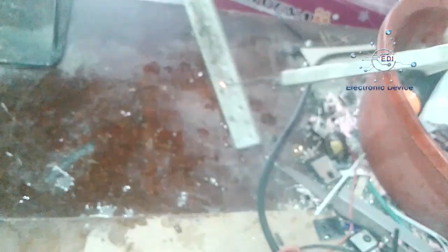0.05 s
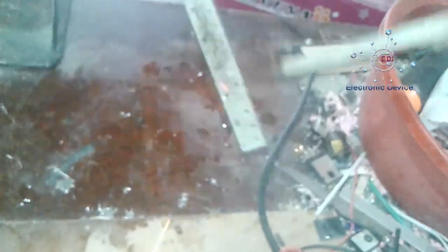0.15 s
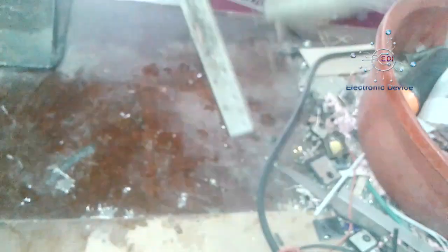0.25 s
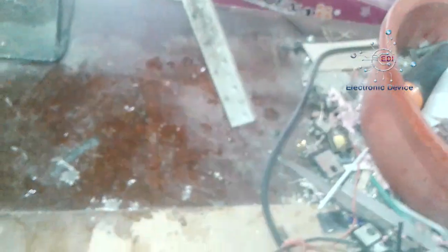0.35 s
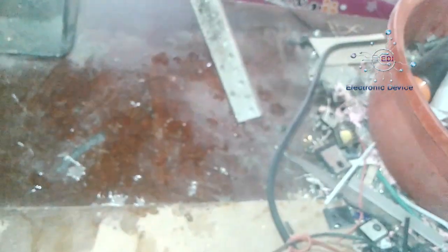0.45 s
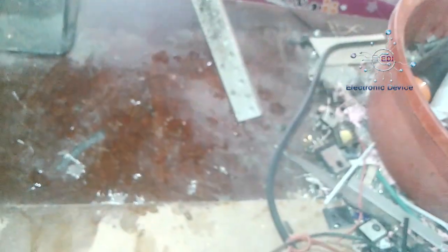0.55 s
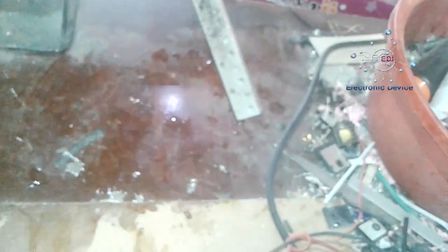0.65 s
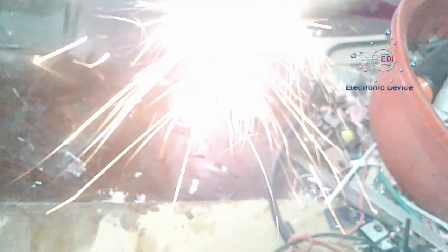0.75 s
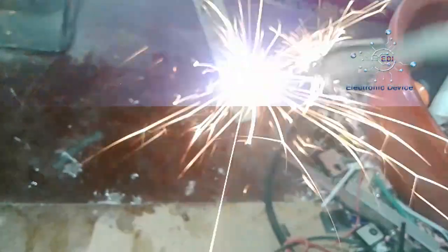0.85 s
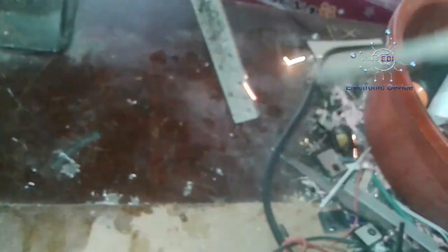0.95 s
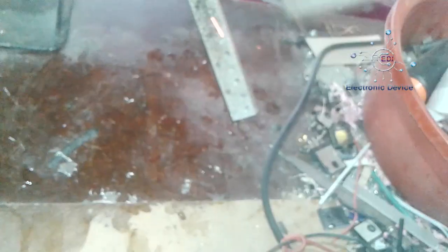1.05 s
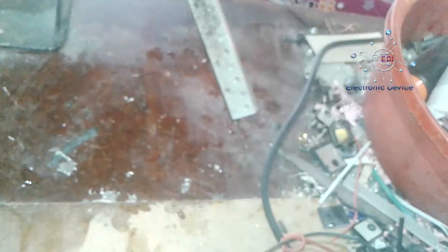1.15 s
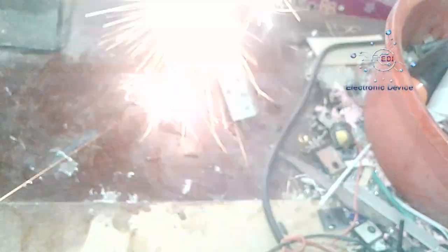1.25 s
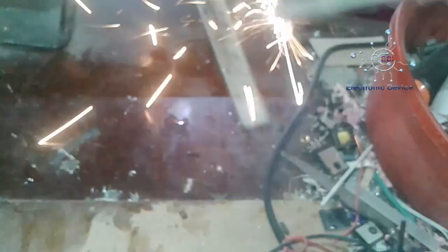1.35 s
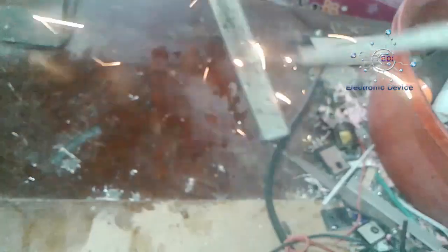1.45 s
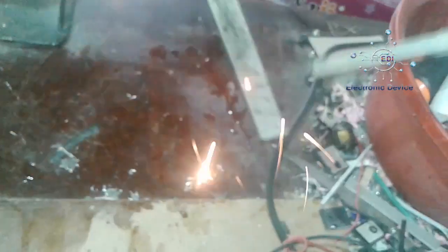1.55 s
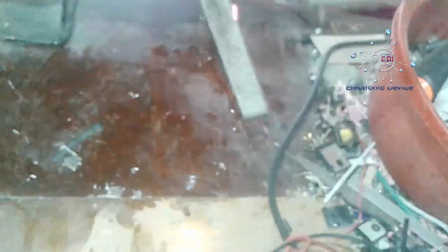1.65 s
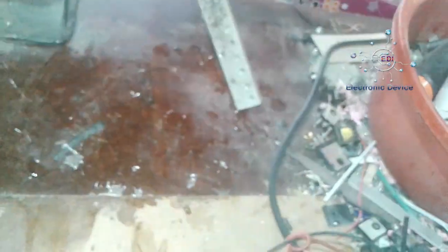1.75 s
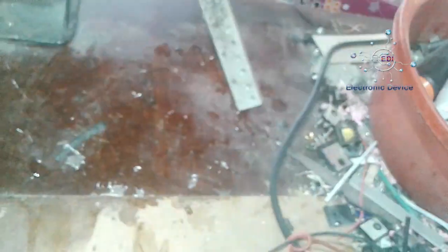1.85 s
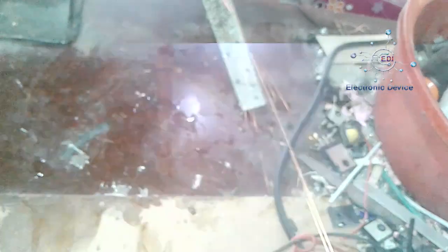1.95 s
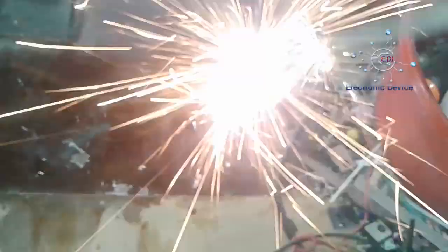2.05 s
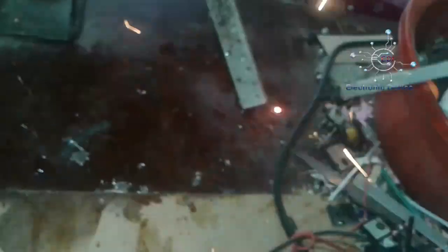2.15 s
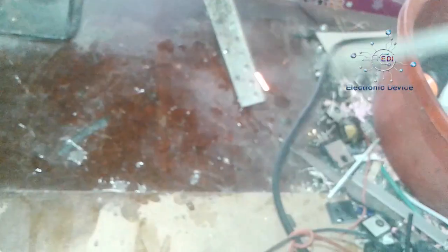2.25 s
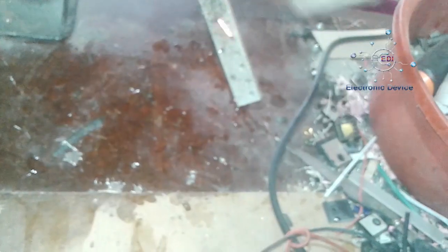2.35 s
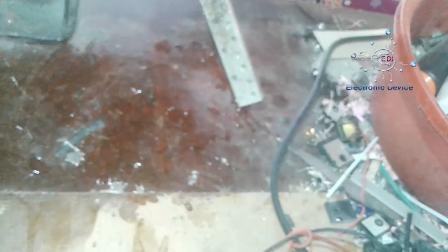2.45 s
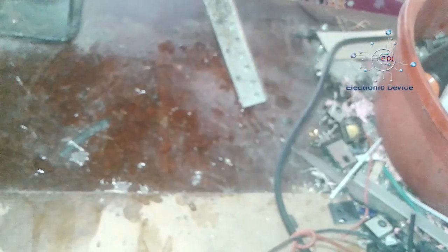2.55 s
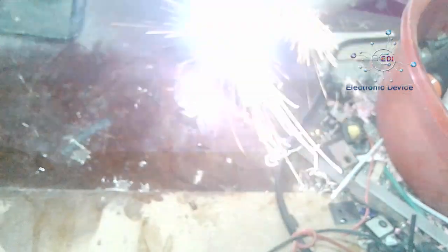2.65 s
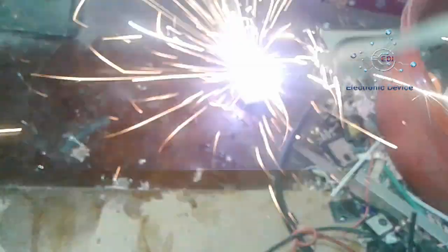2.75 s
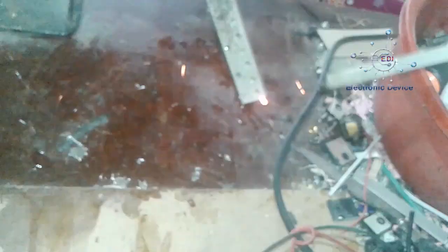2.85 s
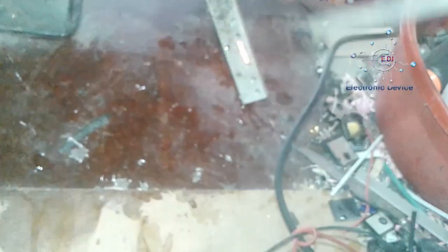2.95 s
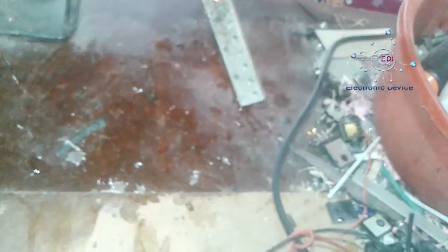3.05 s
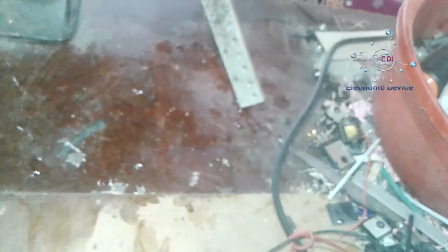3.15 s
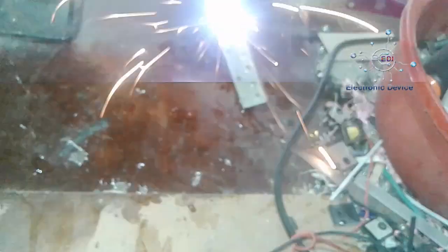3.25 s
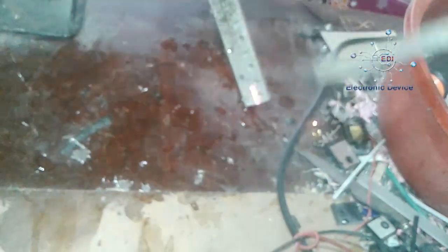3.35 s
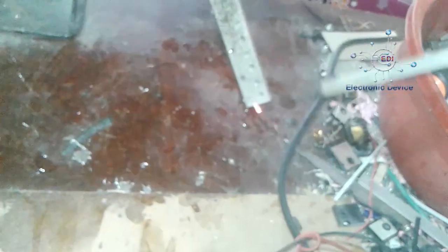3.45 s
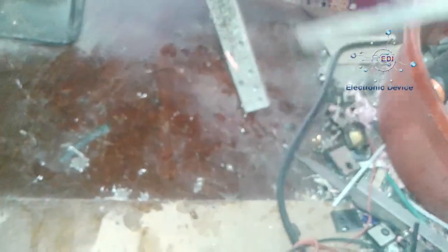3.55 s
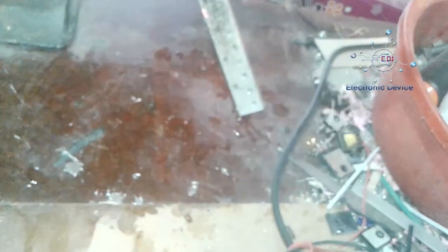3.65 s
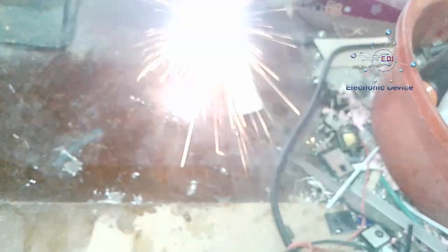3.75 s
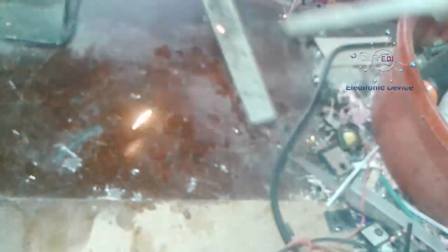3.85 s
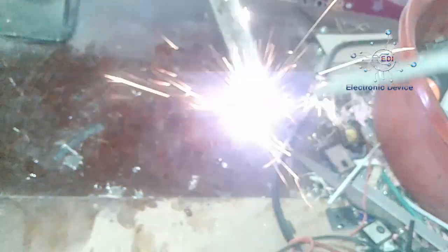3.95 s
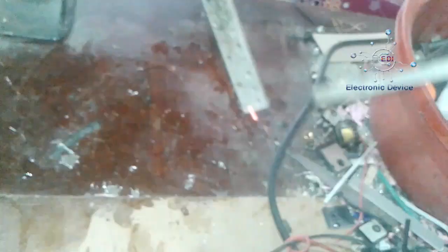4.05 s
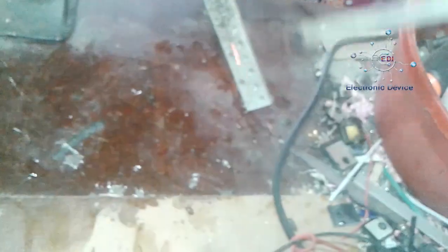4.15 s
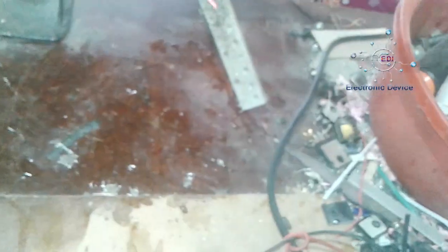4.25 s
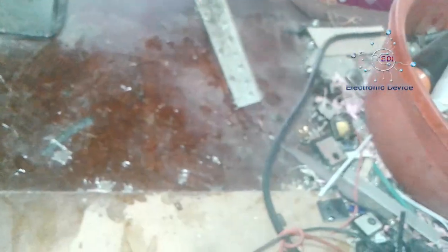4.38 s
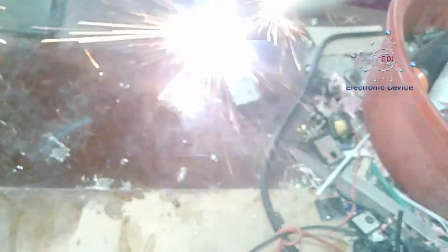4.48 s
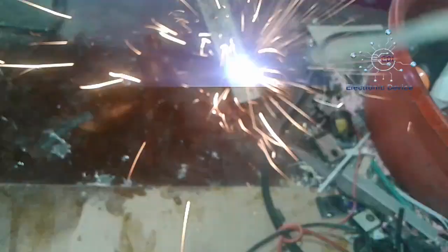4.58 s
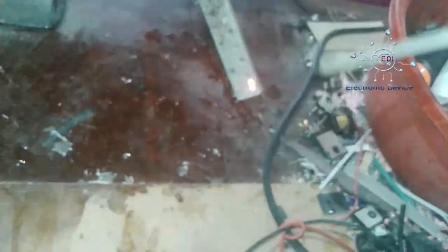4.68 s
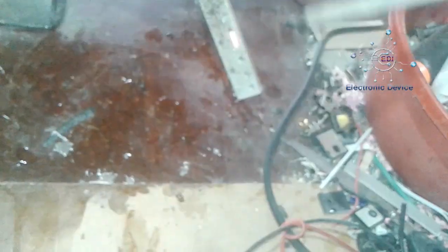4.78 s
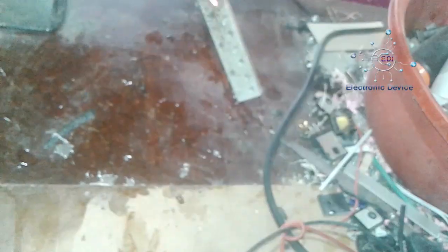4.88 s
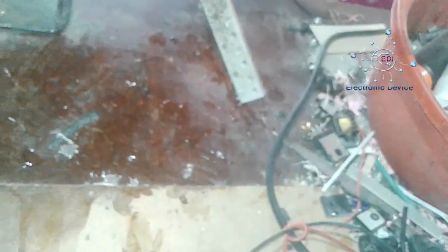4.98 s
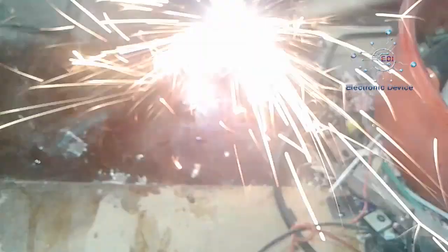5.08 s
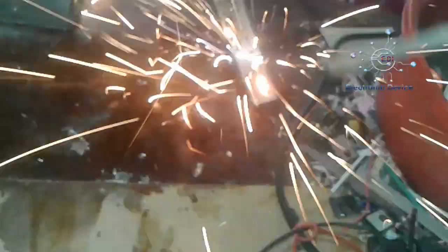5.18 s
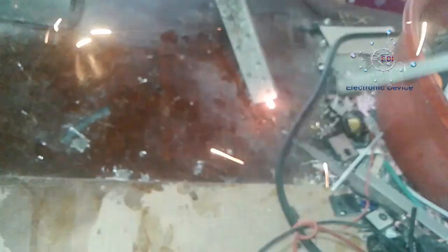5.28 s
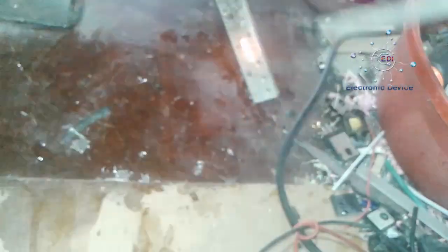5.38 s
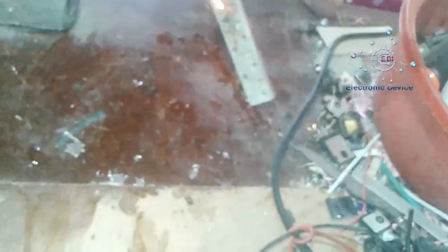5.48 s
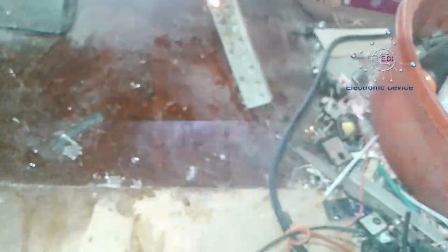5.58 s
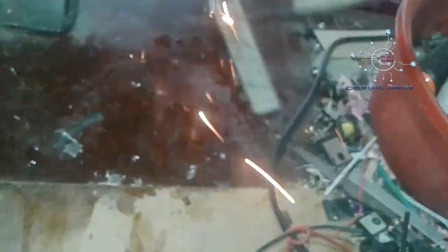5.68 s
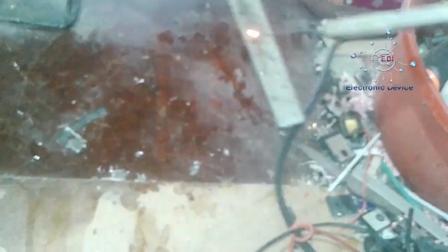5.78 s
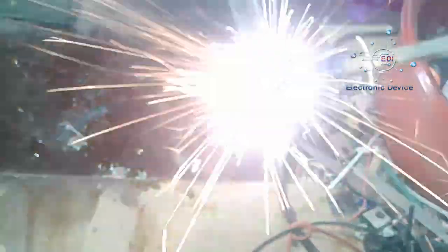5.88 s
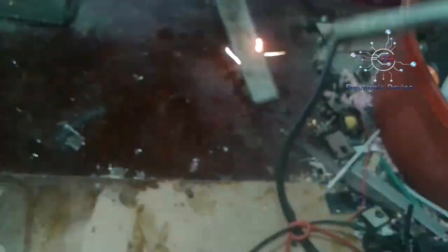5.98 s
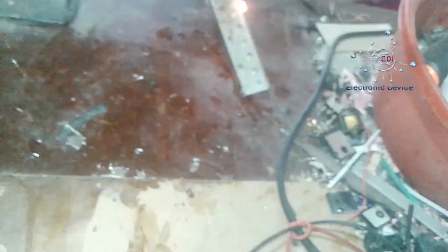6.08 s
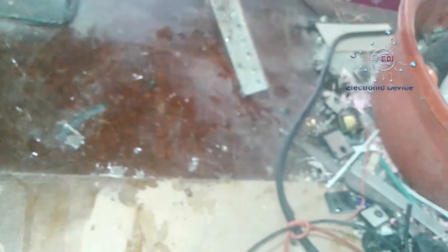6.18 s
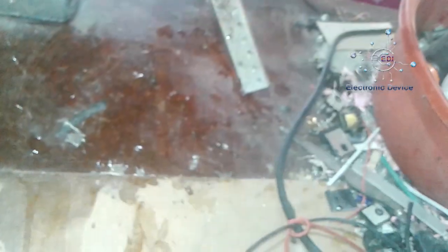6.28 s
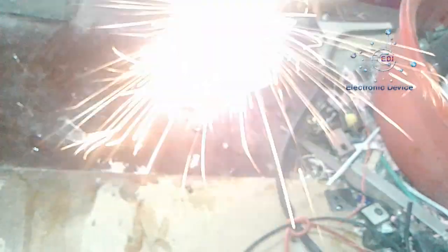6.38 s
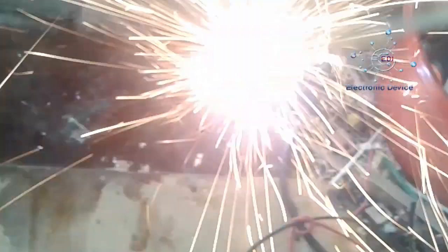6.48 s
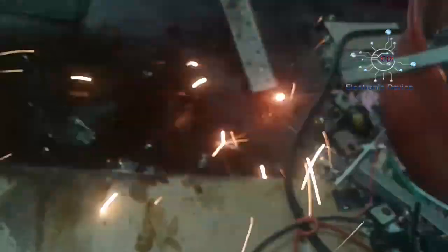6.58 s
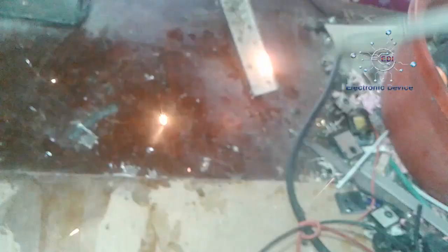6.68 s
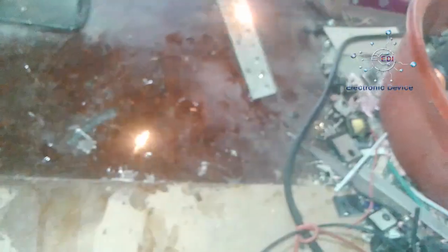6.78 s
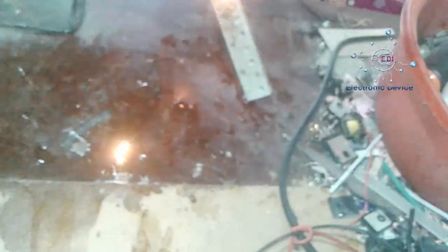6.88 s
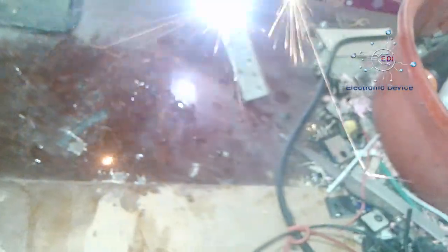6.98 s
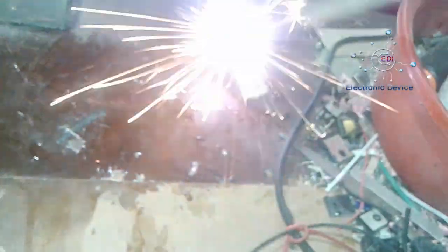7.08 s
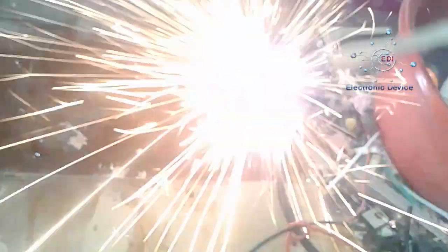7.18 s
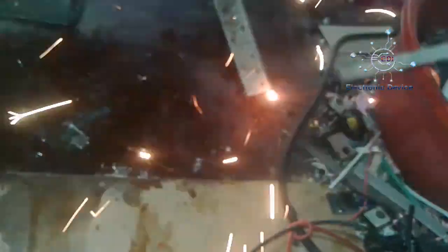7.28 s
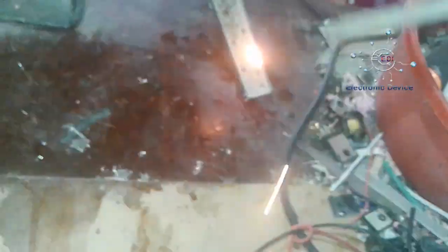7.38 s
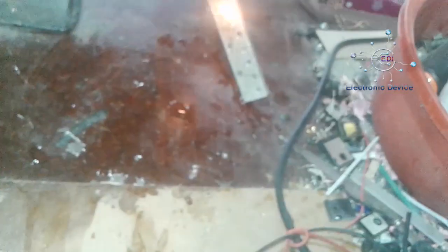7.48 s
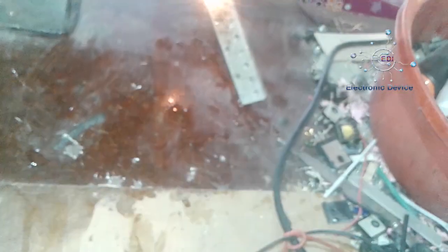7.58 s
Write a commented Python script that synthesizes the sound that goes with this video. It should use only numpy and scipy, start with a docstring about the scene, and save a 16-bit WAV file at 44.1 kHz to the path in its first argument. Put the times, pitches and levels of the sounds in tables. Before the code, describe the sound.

Loud sparks crack again and again as a lead touches a metal strip on a workshop bench, some single dry pops, others brief sputtering arcs. Beneath them an inverter keeps up a thin, fluttering, high-pitched whine, heard plainly in the gaps. The longest crackles come near the end. The microphone is close and distorts on the strongest snaps, each followed by a short room echo, with low room noise and a few soft bumps underneath.

```python
"""A thin, high whine, broken almost at once by sharp electric snaps, close to the microphone.
On the bench of a small, hard workshop, a high-voltage inverter runs while its lead is tapped against
a metal strip again and again. The whine is a train of ringing transformer ticks that switches between
two rates; while the lead is near the strip, the pulses jump the gap as sparks. The snaps fill the
room and overload the microphone. Low room noise and a few soft handling bumps lie underneath."""
import sys
import numpy as np
from scipy import signal
from scipy.fft import rfft, irfft
from scipy.io import wavfile
from scipy.ndimage import uniform_filter1d, minimum_filter1d

SR = 44100
rng = np.random.default_rng(int(sys.argv[2]) if len(sys.argv) > 2 else 0)


def master_out(mix):
    """Clip the mix to full scale and print it as 16-bit PCM to the path in sys.argv[1]."""
    frames = np.transpose(np.atleast_2d(mix))
    ceiling = np.clip(frames, -1, 1)
    pcm = np.round(ceiling * 32767).astype(np.int16)
    wavfile.write(sys.argv[1], SR, pcm)


N = 336483
TIME = np.arange(N) / SR

# Levels in the tables are relative, before each source's own gain.
# Arcs, one per touch of the lead: start_s, length_s, level_db, sputters_per_s
LEAD_TOUCHES = [(.002, 0.0029, -17, 0), (0.153, 0, -7, 500), (.697, 0.0098, -4.5, 500),
                (0.728, .079, 0, 220), (0.86, 0.011, 3.5, 80), (1.297, 0.076, -6, 40),
                (1.397, .046, -13.5, 0), (1.5507, 0.0056, -16, 0), (2.048, 0.096, -3.5, 130),
                (2.713, 0.099, -2, 170), (3.2448, 0, -8, 250), (3.275, 0.025, 2, 250),
                (3.811, 0.018, -16, 0), (3.848, 0.0024, -12.5, 0), (3.9788, 0.022, -9, 0),
                (4.022, 0.016, -2.5, 300), (4.491, 0.014, -8, 0), (4.536, .098, -3.5, 130),
                (5.1143, 0.02, -10.5, 0), (5.1775, 0.038, -0.5, 60), (5.23, .02, -9, 60),
                (5.6856, 0.0097, -2.5, 0), (5.898, .024, -3, 700), (5.955, 0.022, -6, 120),
                (6.4161, 0.19, -5, 150.5), (7.0313, 0.022, -2, 150), (7.087, 0.026, 0, 180),
                (7.135, .128, -5, 90)]
# Dry pops where the lead only grazes the strip: start_s, click_db
LEAD_GRAZES = [(.0264, -6), (.062, -13), (.072, -11.5), (1.538, -4.5), (3.8992, -2), (5.166, -4.5),
               (5.712, 13), (5.774, 1), (5.853, -7.5), (5.86, -14)]
# Spectrum of a spark's bright crack: frequency_hz, level_db
SNAP_SPECTRUM = [(100, -45), (500, -30), (1500, -24.5), (3000, -20), (4500, -16.5), (5600, -9),
                 (6300, -6.5), (6800, -1), (7250, 0.5), (7900, -3), (9000, -10), (11000, -13.5),
                 (16000, -18.5)]
# Spectrum of a spark's dull click: frequency_hz, level_db
CLICK_SPECTRUM = [(30, -16), (70, -4), (170, -9.5), (350, 3.5), (700, 6), (1200, 2.5), (2000, 1),
                  (3800, -1.5), (4400, -0.5), (9000, -26.5)]
# The inverter's slow drift: time_s, switch_rate_hz, slow_pulse_rate_hz
INVERTER_DRIFT = [(0, 7.8, 150.1), (1.2, 7.8, 150.6), (2.4, 7.55, 151.6), (4, 7.58, 153.5),
                  (7.63, 7.8, 157.1)]
# Ringing modes of the transformer: pitch_hz, width_hz, level_db
TRANSFORMER_MODES = [(2880, 170, -16.5), (4450, 106, -3), (4670, 396, -9.5), (5206, 480, -4.5),
                     (5790, 380, -2.5), (6500, 274, -2.5), (7250, 225, 2.5), (7590, 240, -1.5),
                     (8170, 550, -5.5), (9010, 335, 0), (10250, 170, -16), (10200, 1200, -21.5),
                     (12570, 780, -12), (17300, 1100, -4)]
# Reflections of each tick off the bench: delay_ms, gain
BENCH_ECHOES = [(1.223, 0.32), (2.401, 0.32)]
# Soft handling bumps on the bench: start_s, level_db
HANDLING_BUMPS = [(1.745, -36.5), (2.451, -40), (6.094, -38), (6.264, -34.5), (7.431, -39)]
# Spectrum of a bump: frequency_hz, level_db
BUMP_SPECTRUM = [(40, 2), (130, 2), (230, 6.5), (400, -6), (1200, -15), (8000, -48)]
# Spectrum of the room noise: frequency_hz, level_db
ROOM_SPECTRUM = [(25, -67), (60, -1.5), (160, 9), (330, 0), (700, 1.5), (1500, -3.5), (3000, -8),
                 (8000, -5), (16000, -55)]


def discharges(pulse_count, strike_db=13, recharge_s=.11, recover_s=.009, click_over_snap_db=9.5,
               spread_db=4, sputter_db=-5, sputter_lateness=2.6, max_sputters=128):
    """Time, snap dB and click dB of each spark: an arc strikes, follows the pulses and sputters."""
    rows = [(s, db - 20, db) for s, db in LEAD_GRAZES]  # a graze has little snap
    last_end = 0
    for start, length, db, sputter_rate in LEAD_TOUCHES:
        end = start + length
        # charge builds while no arc burns and strengthens the first strike
        charge = 1 - np.exp(-max(start - last_end, 0) / recharge_s)
        counts = np.arange(*np.interp([start, end], TIME, pulse_count))[1:]
        pulses = np.interp(counts, pulse_count, TIME)
        pulses = pulses[pulses > start + recover_s * charge]  # the strike briefly drains the inverter
        draws = rng.random(max_sputters)[:round(length * sputter_rate)]
        sputters = start + length * draws ** (1 / sputter_lateness)  # denser towards the end
        snap_db = db + np.r_[strike_db * charge, np.zeros(len(pulses)), [sputter_db] * len(sputters)]
        chance_db = spread_db * rng.standard_normal((2 * max_sputters, 2))[:len(snap_db)]
        chance_db[0] = 0  # the strike has no random spread
        levels_db = np.c_[snap_db, snap_db + click_over_snap_db] + chance_db
        rows.append(np.c_[np.r_[start, pulses, sputters], levels_db])
        last_end = end
    return np.vstack(rows).T


def spark_snaps(times, db, direct_db=19, clutter_db=22, walls_db=21.5, build_s=.0012):
    """Each spark cracks brightly, scattered by the bench clutter and, a little later, by the walls."""
    crack = ring(impulses(times, undb(db)), colour(SNAP_SPECTRUM))
    clutter = scatter(t60_s=.008)
    walls = scatter(t60_s=.36, grain=1.01) * (1 - np.exp(-TIME[:SR] / build_s))
    return undb(direct_db) * crack + ring(crack, undb(clutter_db) * clutter + undb(walls_db) * walls)


def surge_clicks(times, db, gain_db=6, jitter_s=.000725, room_db=-15):
    """Each spark's current surge is picked up as a dull, nearly dry click, never quite on the beat."""
    late_s = jitter_s * rng.random(len(times))
    click = ring(impulses(times + late_s, undb(db + gain_db)), colour(CLICK_SPECTRUM))
    return click + undb(room_db) * ring(click, scatter(t60_s=.11))


def microphone_recoil(times, db, gain_db=-3, knee_db=-3, lag_s=.0019, jitter_s=.0015, width_s=.00059):
    """A strong blast overloads the close microphone, which then swings the other way for a moment."""
    swing = -np.exp(-.5 * ((TIME[:512] - lag_s) / width_s) ** 2)
    late_s = jitter_s * rng.random(len(times))
    overload = np.tanh(undb(db - knee_db) ** 2)
    swings = ring(impulses(times + late_s, overload * undb(gain_db)), swing)
    return low_cut(swings, hz=105, order=2)


def inverter_pulses(fast_share=.39, fast_ratio=1.5, creep=.014, start_phase=.93):
    """Running count of the inverter's pulses: a fast run, then a slow run, in every switch cycle."""
    time_s, switch_hz, slow_hz = np.transpose(INVERTER_DRIFT)
    phase = (start_phase + np.cumsum(np.interp(TIME, time_s, switch_hz)) / SR) % 1
    fast = phase < fast_share
    pulse_hz = np.interp(TIME, time_s, slow_hz) * np.where(fast, fast_ratio, 1)
    # the rate creeps up through the fast run and settles back through the slow one
    rise = np.where(fast, phase / fast_share, ((1 - phase) / (1 - fast_share)) ** 2)
    return np.cumsum(pulse_hz * (1 + creep * rise)) / SR


def transformer_whine(pulse_count, tick_db=-4, fizz_db=-38, near_db=-10, room_db=-7):
    """Each pulse makes the transformer tick and fizz; the bench and the room repeat the tick."""
    times = np.interp(np.arange(1, int(pulse_count[-1])), pulse_count, TIME)
    fizz = undb(fizz_db) * np.exp(-(pulse_count % 1) / .3) * rng.standard_normal(N)
    kicks = impulses(times, undb(tick_db + .11 * rng.standard_normal(len(times))))
    ticks = ring(kicks + fizz, resonances(TRANSFORMER_MODES))
    # the moving hand shifts the reflections a little, so the colour wavers
    close = ticks + sum(gain * np.interp(TIME - (ms + .03 * wander(rate_hz=3)) / 1000, TIME, ticks)
                        for ms, gain in BENCH_ECHOES)
    reflections = undb(near_db) * scatter(t60_s=.022) + undb(room_db) * scatter(t60_s=.12)
    return close + ring(close, reflections)


def workshop(hush_db=-48, flutter_db=3.5, bump_gain_db=23):
    """Low, wavering room noise, with a few soft bumps of the hand and lead on the bench."""
    hush = unit(ring(rng.standard_normal(N), colour(ROOM_SPECTRUM)))
    hush *= undb(hush_db + flutter_db * wander(rate_hz=4.7))
    times, db = np.transpose(HANDLING_BUMPS)
    bumps = ring(impulses(times, undb(db + bump_gain_db)), colour(BUMP_SPECTRUM))
    return hush + ring(bumps, scatter(t60_s=.012))


def resonances(modes):
    """Unit-energy ring of damped modes; neighbours swing in opposite senses."""
    t = TIME[:1024]
    response = sum((-1) ** k * width * undb(db) * np.exp(-np.pi * width * t) * np.sin(2 * np.pi * hz * t)
                   for k, (hz, width, db) in enumerate(modes))
    response = low_cut(response, hz=2800, order=4)
    return response / np.linalg.norm(response)


def colour(spectrum, size=4096):
    """Causal response of unit energy with the given spectrum."""
    hz, db = np.transpose(spectrum)
    bin_hz = np.arange(size // 2 + 1) * SR / size
    cepstrum = irfft(np.log(undb(np.interp(np.log(bin_hz + 1), np.log(hz), db))))
    cepstrum[1:size // 2] *= 2  # fold to minimum phase
    cepstrum[size // 2 + 1:] = 0
    response = irfft(np.exp(rfft(cepstrum)))
    return response / np.linalg.norm(response)


def impulses(times, sizes, order=8):
    """Band-limited impulses placed between the samples."""
    at = np.asarray(times)[:, None] * SR
    taps = np.floor(at).astype(int) + np.arange(1 - order, order + 1)
    shape = np.sinc(taps - at) * np.cos(np.pi * (taps - at) / (2 * order)) ** 2
    return np.bincount(np.clip(taps, 0, N - 1).ravel(), (shape * sizes[:, None]).ravel(), N)


def scatter(t60_s, grain=0.):
    """Fading cloud of reflections of unit energy; grain makes some stand out."""
    cloud = rng.standard_normal(SR)
    cloud *= np.exp(grain * rng.standard_normal(SR) - np.log(1000) * TIME[:SR] / t60_s)
    return cloud / np.linalg.norm(cloud)


def wander(rate_hz):
    """Slow random drift with a spread near 1."""
    knots = rng.standard_normal(int(N / SR * rate_hz) + 2)
    return np.interp(TIME * rate_hz, np.arange(len(knots)), knots)


def ring(x, response):
    """Pass a sound through an impulse response."""
    return signal.fftconvolve(x, response)[:N]


def low_cut(x, hz, order):
    """Butterworth high-pass."""
    return signal.sosfilt(signal.butter(order, hz, "high", fs=SR, output="sos"), x)


def undb(db):
    """Decibels to amplitude."""
    return 10 ** (np.asarray(db) / 20)


def unit(x):
    """Scale to rms 1."""
    return x / np.sqrt(np.mean(x ** 2))


def limiter(x, peak=.92, window=1100):
    """Looks 25 ms ahead: the whine ducks before a loud spark, and the echo swells as the gain returns."""
    allowed_gain = peak / np.maximum(np.abs(x), peak)
    return x * uniform_filter1d(minimum_filter1d(allowed_gain, window), window)


def scene():
    """One microphone close to the bench; the same pulses drive the sparks and the whine."""
    pulse_count = inverter_pulses()
    times, snap_db, click_db = discharges(pulse_count)
    sparks = spark_snaps(times, snap_db) + surge_clicks(times, click_db)
    sparks += microphone_recoil(times, snap_db)
    return (sparks + transformer_whine(pulse_count) + workshop())[None]


def record(dry, ceiling=1.39, low_hz=45, top_hz=15900):
    """The microphone stage saturates, a limiter holds the peaks; the deep bass and the top are cut."""
    oversampled = signal.resample_poly(dry, 2, 1, axis=1)
    saturated = signal.resample_poly(ceiling * np.tanh(oversampled / ceiling), 1, 2, axis=1)
    limited = limiter(low_cut(saturated, low_hz, order=3))
    return signal.sosfilt(signal.ellip(10, .2, 80, top_hz, fs=SR, output="sos"), limited)


dry = scene()
out = record(dry)
master_out(out)
```